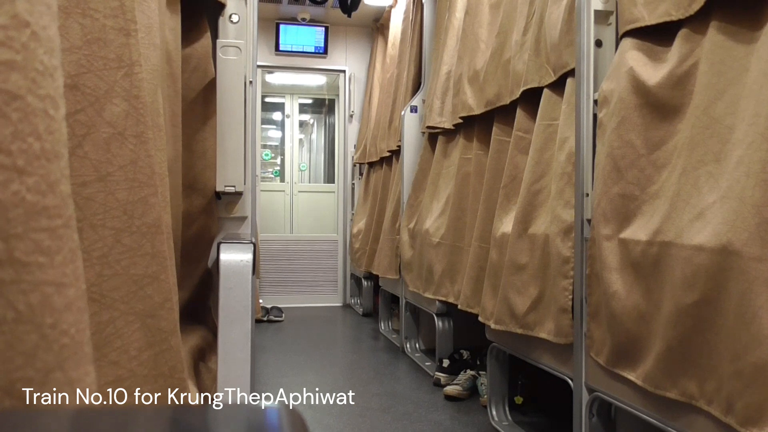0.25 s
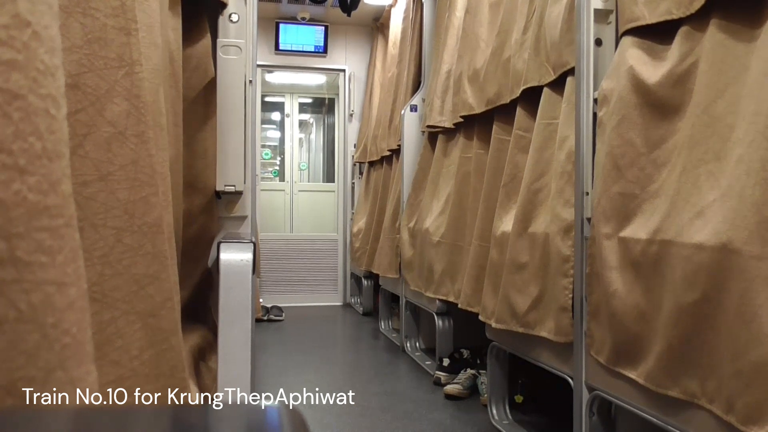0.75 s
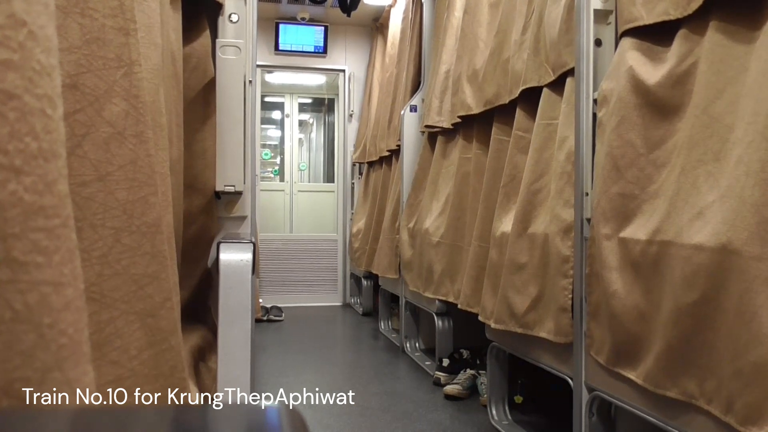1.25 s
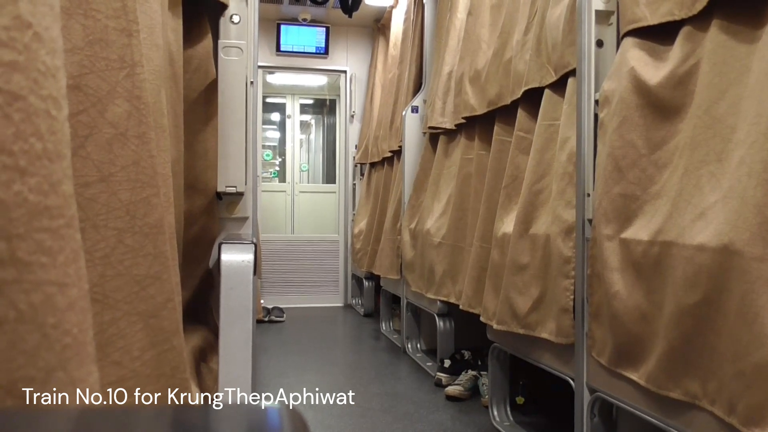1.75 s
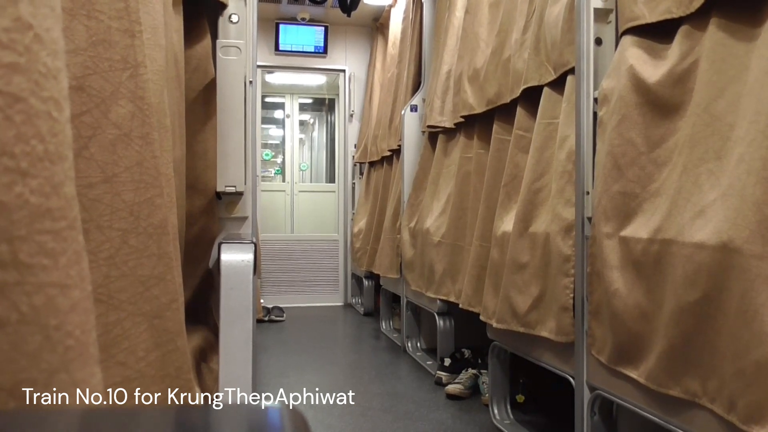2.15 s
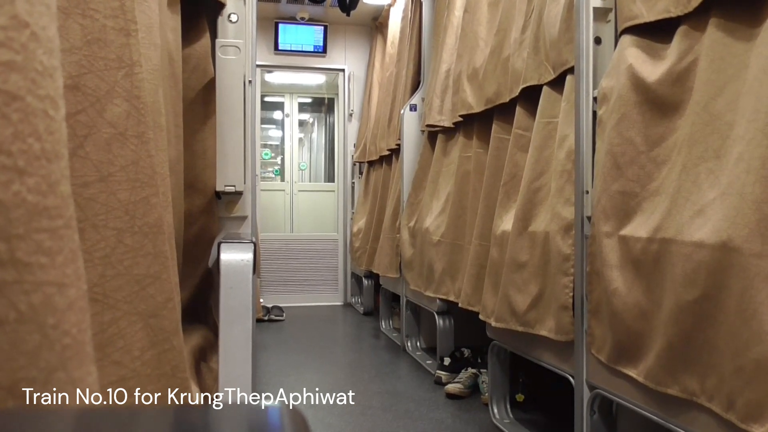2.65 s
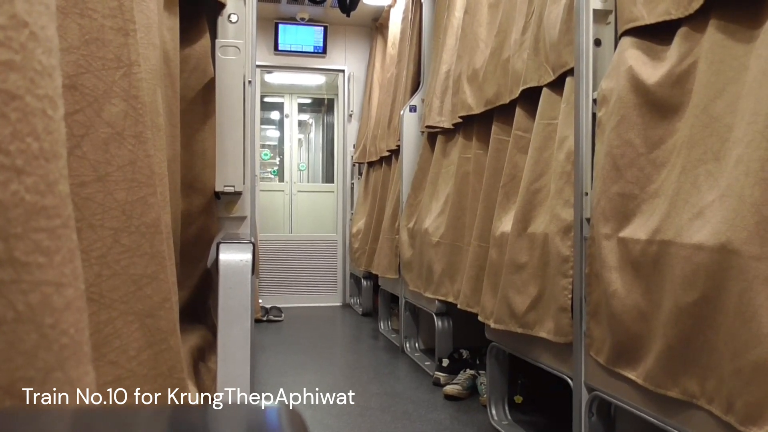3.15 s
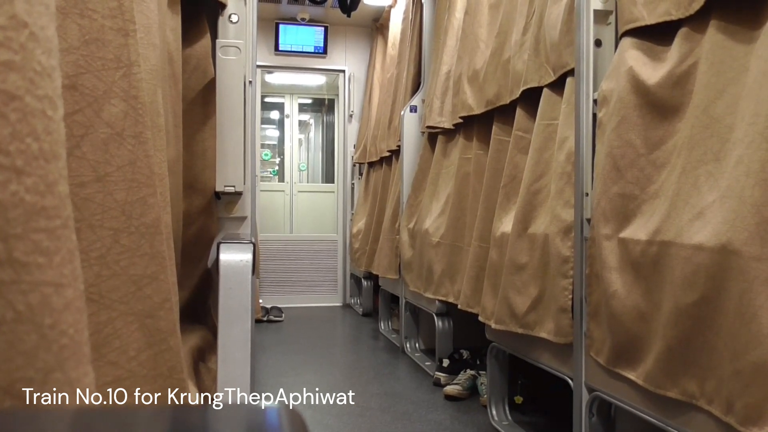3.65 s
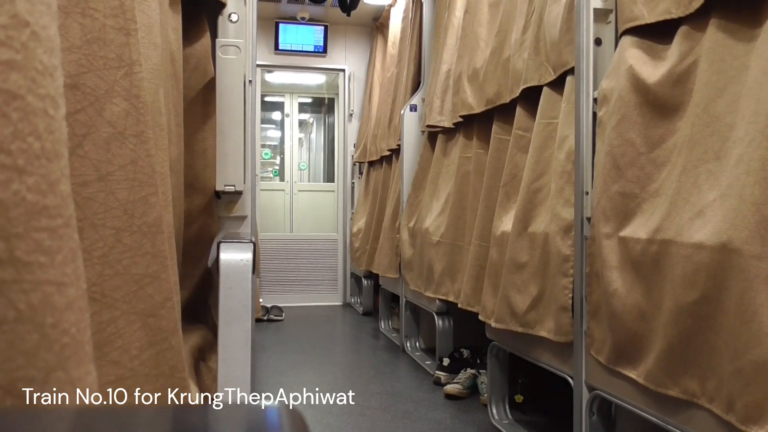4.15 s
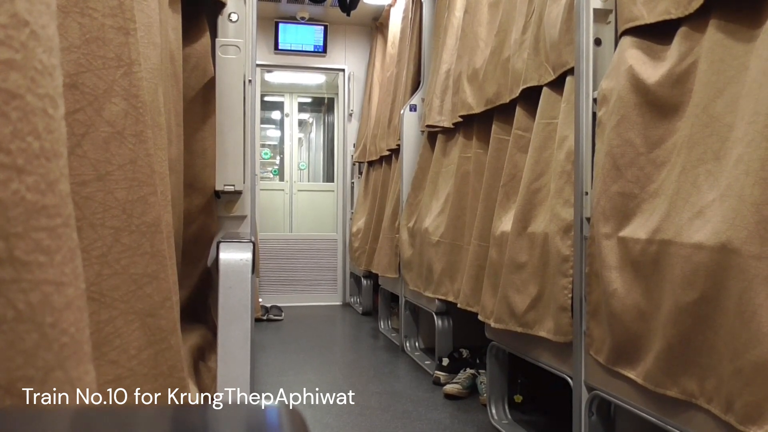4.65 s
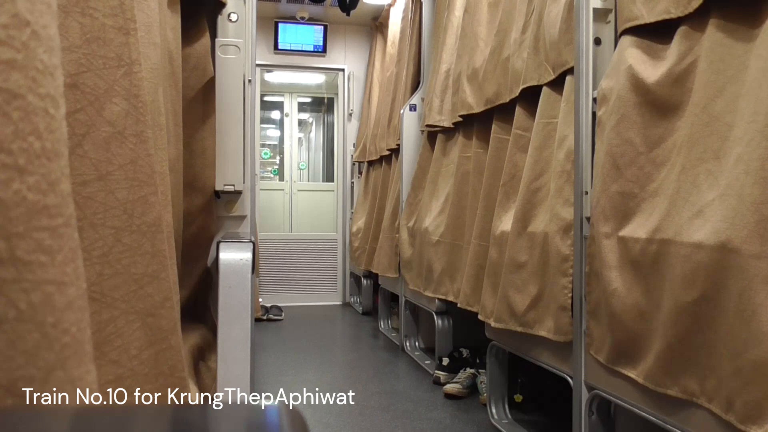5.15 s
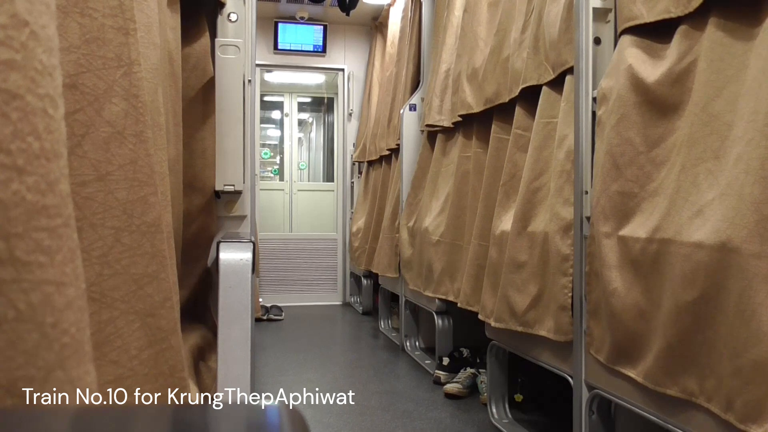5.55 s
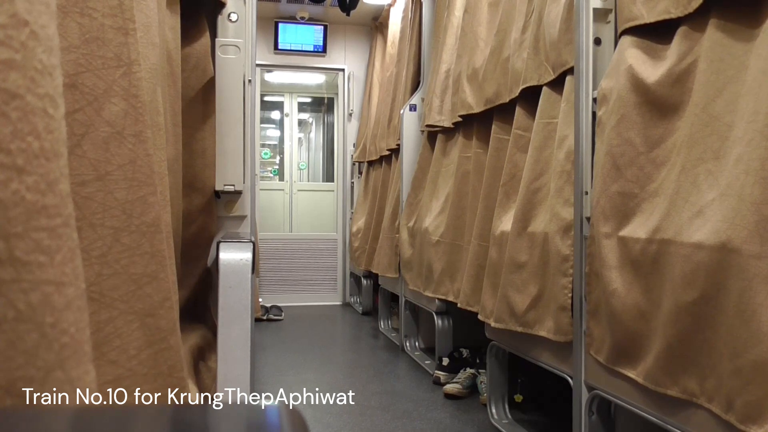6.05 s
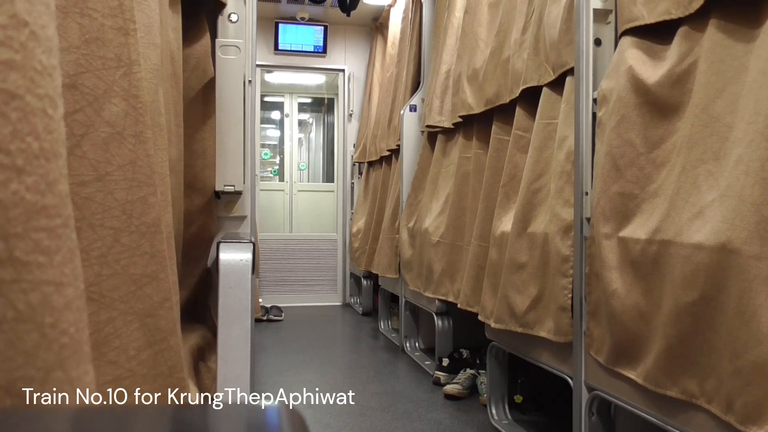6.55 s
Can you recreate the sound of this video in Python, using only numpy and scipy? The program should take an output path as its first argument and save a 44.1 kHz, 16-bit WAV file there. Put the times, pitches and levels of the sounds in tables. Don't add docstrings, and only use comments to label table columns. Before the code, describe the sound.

Deep train rumble with airy hiss inside a sleeper carriage, rubbery squeaks, a rapid loose ticking and dull jolts over rail joints.

```python
import sys
import numpy as np
from scipy import signal
from scipy.fft import rfft, irfft
from scipy.io import wavfile

SR = 44100
rng = np.random.default_rng(int(sys.argv[2]) if len(sys.argv) > 2 else 0)


def field_ratio(decibels):
    return 10 ** (np.asarray(decibels, dtype=float) / 20)


def store_pcm(level_fs):
    pcm = np.round(np.clip(level_fs, -1, 1) * 32767).astype(np.int16)
    wavfile.write(sys.argv[1], SR, np.atleast_2d(pcm).T)


N = 299880

RUMBLE_EDGES_HZ = [20, 110, 220, 450, 1750]
HISS_EDGES_HZ = [1750, 3600, 11300, 17000]
# frequency_hz, density_db_per_hz
RUMBLE_COLOUR = [(13, -63.5), (22, -14), (65, -5), (118, -9.5), (156, 0.5), (210, -5), (294, 3), (323, -5),
                 (361, -2.5), (443, -19.5), (515, -14.5), (668, -22), (1070, -23.5), (1460, -32.5),
                 (1900, -47.5), (2470, -69.5), (4180, -120)]
HISS_COLOUR = [(940, -39.5), (1600, 1), (1760, -2.5), (2280, 0), (2490, -7), (2820, -9), (3200, -15),
               (4470, -16), (7090, -20), (13600, -22), (15900, -21.5)]
ROUGH_COLOUR = [(200, -6.5), (300, 0), (390, 1), (470, -7), (520, -5.5), (620, -9.5), (800, -23)]
TICK_COLOUR = [(1760, -41.5), (3000, -1), (3500, -6.5), (3990, 2), (4500, -4.5), (5390, 5.5), (6740, -7),
               (7740, 1.5), (9550, -4), (11100, 2.5), (12300, -5), (15900, -6)]
# frequency_hz, width_hz, lift_db
CABIN_MODES = [(155.4, 9.9, 2), (183, 7.3, 8), (309, 11, 2), (341.3, 25, 3.5), (522, 14, 3.5),
               (768, 110, 5.5), (922, 56, 5.5), (1050, 35, 3.5), (1190, 77, 4), (2030, 40, 3.5),
               (2104, 38, 5.5), (2765, 70, 6.5), (3500, 58, 2), (4420, 150, 4)]
# frequency_hz, correlation (0 to 1)
PORT_LIKENESS = [(30, 0.94), (60, 0.64), (130, 0.83), (290, 0.68), (640, 0.61), (1410, 0.7), (3100, 0.7),
                 (6820, 0.52), (15000, 0.12)]
# frequency_hz, left_minus_right_db
PORT_BALANCE = [(60, 3.5), (110, 4), (200, -0.5), (380, -5), (700, -3.5), (1290, -4.0), (2380, 0.5),
                (4400, -0.5), (8120, 4), (15000, -0.5)]
# frequency_hz, left_lead_rad
PORT_LEAD = [(0, 0.52), (1290, -0.61), (1550, -0.7), (2150, -1.24), (2580, -0.75), (6030, -0.46),
             (7490, -0.7), (8010, -0.12), (9910, 0.057), (10800, 0.1), (13400, -0.0), (13700, -0.2),
             (14200, 0.07), (15600, -0.0)]

# time_s, level_db, lean_db (floor boom towards cabin drone), grind_db (rail surface)
LOAD = [(0, -19.5, 0, -2.5), (.49, -25.5, -3, -3.5), (.55, -18, -2.5, -6), (1.08, -22, -0.5, -5),
        (1.57, -18, -2, -1), (2.25, -22.5, 0, 2), (2.62, -24, -1.5, -1.5), (2.76, -17.5, -0.5, 1),
        (3.5, -22, -1, -2), (4.07, -23.5, 0, -0.5), (4.3, -23.5, 0, 0.5), (4.75, -26, 1, 1),
        (4.82, -19.5, -0.5, 0), (5.3, -26.5, -3, -1), (5.65, -20.5, 2, 2.5), (5.8, -25.5, 2.5, 2.5),
        (6.34, -21, 0.5, 2), (6.8, -29, -0.5, -1)]
# crest_s, lift_db, length_s
SURGES = [(0.576, 0.5, 0.21), (2.888, 1, 0.087), (3.22, 3.5, 0.071), (4.129, 9, 0.12), (4.828, 2, 0.14),
          (5.593, 1.5, 0.47), (6.379, 2.5, 0.15), (6.57, 3, 0.09), (6.694, 6, 0.15)]
# time_s, level_db, flange_grind_db
ROUGH_RAIL = [(1.0, -31.5, 3), (1.25, -24, 7.5), (1.45, -15.5, 9), (1.58, -16, 9), (1.72, -15.5, 8),
              (1.8, -16.5, 6), (1.95, -14.5, 12.5), (2.1, -12.5, 9), (2.16, -14.5, 5), (2.24, -22, -3),
              (2.35, -35, -0.5)]
# crest_s, lift_db, length_s
FLANGE_BITES = [(.21, 0.5, 0.05), (1.41, 5.5, 0.12), (1.5, 3, 0.068), (1.6, 5.5, 0.1), (1.73, 5, 0.054),
                (1.84, 0, .1), (1.98, 0.5, 0.068), (2.09, 4, 0.1), (2.88, -1.5, 0.056), (2.97, 3.5, 0.35),
                (3.42, 4.5, 0.13), (6.12, 1.5, 0.087)]
# time_s, level_db
SWAY = [(0.0, -33), (0.47, -41), (0.55, -34.5), (1.4, -34.5), (1.75, -41), (2.2, -38.5), (2.5, -42),
        (2.99, -31), (4.03, -39), (4.18, -26.5), (4.26, -34), (6.21, -35), (6.25, -29), (6.5, -33),
        (6.8, -36)]
# level_db, load_share (dB per dB), grind_share (dB per dB)
REGISTERS = [
    (-27.5, 1, 0.018),
    (-25, 0.97, 0.051),
    (-34.5, 0.22, 0.94),
]
# level_db, load_share (dB per dB), grind_share (dB per dB)
AIRS = [
    (-56.5, -0.13, 0.84),
    (-62.5, 0.21, 0.59),
    (-74, -.6, -1.1),
]
# pitch_hz, width_hz, level_db
HUMS = [
    (150.6, 3.5, -35.5),
    (301, 4.7, -36.5),
    (114.4, 3.6, -41),
    (2114, 20, -68),
]
# time_s, pitch_hz, level_db
FLOOR_RIDGE = [(0, 179.7, -29), (.5, 172.6, -32), (2.1, 175.4, -27.5), (2.35, 150, -25.5),
               (3.2, 150, -32.5), (4.0, 147.7, -36.5), (4.8, 151.4, -31), (5.3, 164.4, -40.5),
               (6.8, 154.5, -28)]

# start_s, length_s, pitch_hz, level_db
SLIPS = [(0, 0.01, 1340, -23.5), (0.02, 0.028, 1341, -25.5), (0.118, 0.03, 1348, -27.5),
         (0.152, 0.026, 1387, -39.5), (1.017, 0.042, 1172, -35.5), (1.022, 0.032, 924, -31.5),
         (1.164, 0.043, 1350, -30), (1.21, 0.042, 1493, -25), (1.295, 0.05, 1560, -38),
         (1.343, 0.024, 1340, -31.5), (1.905, 0.056, 1586, -29.5), (1.938, 0.018, 1477, -21),
         (1.965, .023, 1495, -31), (2.404, 0.048, 1070, -27.5), (2.515, 0.09, 1550, -33.5),
         (2.56, 0.042, 1662, -28.5), (2.6, 0.032, 1680, -37.5), (2.627, 0.043, 1485, -35.5),
         (2.709, 0.034, 1467, -31), (2.742, 0.015, 1373, -21.5), (2.752, 0.027, 1200, -24.5),
         (2.785, 0.029, 1210, -30), (4.51, 0.038, 1212, -36), (4.547, 0.046, 1376, -36.5),
         (5.466, 0.057, 1337, -27.5), (5.577, 0.039, 1335, -30), (5.62, .023, 1325, -32),
         (5.52, 0.056, 1335, -41), (5.695, 0.079, 1335, -36.5), (5.812, 0.043, 1340, -26.5),
         (5.863, 0.068, 1328, -35), (5.91, 0.035, 1170, -32), (5.475, 0.048, 1185, -37),
         (5.64, .024, 1676, -44), (5.763, .022, 1390, -48), (1.145, 0.059, 1197, -39)]
# start_s, length_s, from_hz, to_hz, level_db
SLIDES = [(0.084, 0.034, 1412, 1520, -33), (0.171, 0.05, 1400, 1405, -37), (1.127, .024, 1011, 1090, -32.5),
          (1.268, 0.031, 1485, 1510, -32), (2.444, 0.036, 1152, 1232, -14),
          (2.465, 0.044, 1285, 1608, -20.5), (2.493, 0.044, 1505, 1614, -28.5),
          (4.338, 0.028, 1190, 1320, -37), (4.49, 0.066, 1196, 1420, -36.5),
          (4.654, 0.032, 1227, 1170, -33), (5.641, 0.025, 1460, 1485, -33)]
# start_s, length_s, level_db
WHISTLES = [(0, 0.048, -58.5), (2.627, 0.074, -57), (2.698, .075, -60), (5.455, .075, -63)]
# crest_s, overtone_gain_db, length_s
SQUEEZES = [(1.93, 15, .13), (2.5, 16, 0.097), (2.585, 16, 0.15), (2.75, 10.5, 0.041), (5.65, 4, .05)]
# pitch_hz, level_db, t60_s
SQUEAK_PANEL = [(920, -11, .15), (1070, -2.5, 0.098), (1190, 7.5, 0.12), (1350, 5.5, 0.2),
                (1485, 6.5, 0.15), (1710, 1.5, 0.19)]

# start_s, peak_db
EARLY_TICKS = [(0.0228, -35.5), (0.064, -31), (0.1037, -33.5), (0.1436, -31), (0.1847, -36), (0.229, -33.5),
               (0.2648, -32.5), (0.3092, -35), (0.3497, -34.5), (0.39, -32), (0.4349, -38), (0.6564, -36),
               (0.939, -40), (1.0949, -37), (1.1365, -32.5), (1.215, -32), (1.2964, -31.5), (1.3243, -34.5),
               (1.3616, -33.5), (1.3914, -32), (1.458, -30.5), (1.7552, -31.5), (2.1286, -34),
               (2.364, -37.5), (2.4568, -41), (2.487, -35), (2.548, -35), (2.598, -40.5), (2.6414, -38),
               (2.6733, -34), (2.6938, -33.5), (2.9198, -43), (3.1333, -40.5), (3.2405, -40)]
LATE_TICKS = [(4.793, -41), (4.8106, -44.5), (4.9144, -35), (4.9406, -33.5), (4.9677, -39.5), (5.0093, -33),
              (5.0475, -38), (5.068, -33.5), (5.1504, -38), (5.231, -39), (5.269, -33), (5.295, -35),
              (5.3732, -35), (5.4746, -41.5), (5.494, -36), (5.517, -38), (5.5534, -35.5), (5.5723, -35),
              (5.6118, -37.5), (5.6322, -35), (5.654, -32), (5.7077, -36), (5.7819, -32), (5.8442, -38),
              (5.8662, -42), (5.9245, -38.5), (5.945, -35.5), (5.984, -32.5), (6.0234, -37), (6.0917, -36),
              (6.2073, -31), (6.2832, -36.5), (6.4164, -40), (6.4756, -39), (6.5092, -39), (6.5649, -30.5),
              (6.591, -33.5), (6.6676, -32), (6.71, -38), (6.761, -44)]
MORE_TICKS = [(5.361, -40), (6.108, -36), (1.03, -40), (4.71, -49)]

# start_s, peak_db, pitch_hz
PANEL_BLOWS = [(0.053, -8.5, 302.5), (0.153, -15, 345), (0.353, -12.5, 298), (0.418, -9.5, 305),
               (0.62, -7.5, 290), (0.886, -19, 298), (0.992, -13, 284), (1.174, -9.5, 299),
               (1.271, -15, 343), (1.359, -7, 301), (1.426, -18, 396), (1.523, -2.5, 301), (1.621, -8, 311),
               (1.685, -1, 397.4), (1.799, -8.5, 321), (1.965, -24, 316), (2.033, -2.5, 395.6),
               (2.119, -6, 309), (2.334, -18, 308.7), (2.748, -27, 293), (2.963, -8, 289.5),
               (3.13, -10, 288), (3.2, -7, 294.4), (3.301, -11, 237), (3.348, -23, 307),
               (3.627, -12.5, 306), (3.788, -18, 251), (3.985, -20, 354), (4.102, -7.5, 240.4),
               (4.536, -12.5, 287), (4.641, -14, 285.5), (4.782, -10.5, 292.6), (4.925, -7, 360),
               (5.373, -16, 268), (5.5, -7, 286), (5.638, -11.5, 358), (5.798, -10.5, 346),
               (5.894, -11.5, 344), (6.081, -16, 296), (6.189, -9, 349), (6.35, -9, 287), (6.549, -16, 227),
               (6.69, -14, 303), (6.755, -19, 295.5)]
FLOOR_BLOWS = [(0.112, -17, 143.5), (0.299, -23, 175), (0.519, -18, 167), (0.575, -22.5, 166),
               (0.694, -12, 168), (0.78, -3.5, 172.4), (0.968, -16, 149), (1.175, -16.5, 170.5),
               (1.346, -6.5, 164), (1.461, -13.5, 154), (1.649, -14.5, 154), (1.869, -13, 174.7),
               (2.014, -17, 164), (2.101, -16.5, 175.4), (2.182, -18.5, 157.6), (2.278, -18.5, 159.4),
               (2.664, -7, 155.4), (2.762, -5.5, 152.7), (2.851, -6.5, 180.8), (2.972, -8.5, 167.3),
               (3.074, -16.5, 158), (3.316, -15.5, 162.6), (3.475, -9, 181), (3.597, -25, 163.5),
               (4.113, -5.5, 165), (4.546, -11, 165), (4.786, -15.5, 167.7), (4.898, -11.5, 159),
               (4.985, -11.5, 182.7), (5.066, -21, 180.4), (5.145, -20, 195), (5.284, -13.5, 164.6),
               (5.49, -11, 169.6), (5.857, -14, 163), (6.341, -13.5, 183), (6.715, -14, 174.5)]
WALL_TAPS = [(0.203, -20, 551), (0.376, -26, 506), (0.535, -20.5, 574), (0.628, -20, 494),
             (1.062, -30, 524), (1.118, -26, 484), (1.253, -23, 645), (1.357, -16, 670), (1.495, -7, 529),
             (1.549, -20, 505), (1.981, -11, 563), (2.18, -14, 540), (2.283, -17, 504), (2.388, -14.5, 492),
             (2.681, -25, 595), (2.74, -24, 514), (2.855, -17, 466), (3.068, -22, 471), (3.68, -20, 502),
             (4.102, -23.5, 554), (4.198, -17, 519), (4.428, -25.5, 775), (4.634, -33, 533),
             (4.826, -19, 520), (5.051, -27, 527), (5.141, -26, 517), (5.239, -20, 531),
             (5.524, -15.5, 564), (5.779, -19.5, 777), (6.094, -18.5, 756), (6.258, -17.5, 509),
             (6.361, -26, 523), (6.541, -13.5, 522), (6.657, -25, 480)]
# start_s, knock_db, thud_db, clatter_db
JOLTS = [(0.2, -28, -17, -33), (0.532, -19, -13, -49), (0.625, -26.5, -17, -47), (1.024, -16.5, -24, -52),
         (1.39, -6, -11.5, -47), (1.424, -36, -20, -55), (1.59, -22, -18, -33), (1.684, -14, -11, -52),
         (1.712, -21, -10, -58), (2.116, -32, -13.5, -50), (2.386, -23, -10.5, -60),
         (2.851, -6.5, -14.5, -59.5), (2.944, -11, -15.5, -51), (3.066, -39, -28, -56),
         (3.236, -16, -14, -29), (3.39, -18, -20, -59), (3.481, -18, -14, -57), (3.68, -17.5, -33, -58),
         (4.102, -45, -16, -59), (4.828, -24, -16.5, -53), (5.069, -18, -30, -46), (5.139, -20.5, -16, -49),
         (5.234, -28, -24, -42), (5.639, -34, -14, -60), (6.093, -17.5, -31, -42), (6.539, -13, -13.5, -43)]
# pitch_hz, level_db, t60_s
BODY_MODES = [(535, 6, 0.11), (603, 0.5, 0.099), (754, 4, 0.026), (873, -4.5, 0.13), (964, -1.5, 0.06),
              (1060, -6.5, 0.063), (1184, -1, 0.038), (1295, -6.5, 0.047)]


def at_hz(points, hz):
    table_hz, values = np.array(points).T
    return np.interp(np.log(hz + 1), np.log(table_hz + 1), values)


def in_time(rows):
    s, *columns = np.transpose(rows)
    return [np.interp(np.arange(N) / SR, s, column) for column in columns]


def humps(events):
    t = np.arange(N) / SR
    return sum(db * np.cos(np.pi * np.clip((t - s) / length, -.5, .5)) ** 2 for s, db, length in events)


def drift(rate_hz):
    every = 40
    r = np.exp(-80 * np.pi * rate_hz / SR)
    noise = rng.standard_normal(N // every + 2002)
    slow = signal.lfilter([1], [1, -2 * r, r * r], noise)[2000:]
    return np.interp(np.arange(N) / every, np.arange(len(slow)), slow / np.std(slow))


def ring(drive, hz, t60):
    r, w = field_ratio(-60 / (t60 * SR)), 2 * np.pi * hz / SR
    return signal.lfilter([0, np.sin(w)], [1, -2 * r * np.cos(w), r * r], drive + 1e-18)


def bursts(events, column, t60, rise_s):
    t = np.arange(round(t60 * SR) + 2) / SR
    shape = np.zeros(N + SR)
    for row in events:
        at = round(row[0] * SR)
        shape[at:at + len(t)] += field_ratio(row[column] - 60 * t / t60) * np.minimum(t / rise_s, 1)
    return shape[:N]


def pair(left, right):
    hz = np.fft.rfftfreq(N, 1 / SR)
    half = field_ratio(at_hz(PORT_BALANCE, hz) / 2) * np.exp(.5j * at_hz(PORT_LEAD, hz))
    return np.array([irfft(left * half, N), irfft(right / half, N)])


def diffuse(colour, edges_hz, levels_db, flutter_db):
    hz = np.fft.rfftfreq(N, 1 / SR)
    lift_db = sum(db / (1 + (2 * (hz - f) / width) ** 2) for f, width, db in CABIN_MODES)
    alike = np.clip(at_hz(PORT_LIKENESS, hz), 0, 1)
    mid, side = rfft(rng.standard_normal((2, N))) * field_ratio(at_hz(colour, hz) + lift_db)
    mid = mid * np.sqrt(1 + alike)
    side = side * np.sqrt(1 - alike)
    out = 0
    for low, high, level_db in zip(edges_hz, edges_hz[1:], levels_db):
        band = 1 / np.sqrt((1 + (low / (hz + 1)) ** 24) * (1 + (hz / high) ** 24))
        part = pair((mid + side) * band, (mid - side) * band)
        out = out + part / np.std(part.mean(0)) * field_ratio(level_db + flutter_db * drift(7.0))
    return out


def wheel_load():
    level_db, lean_db, grind_db = in_time(LOAD)
    flange_db = in_time(ROUGH_RAIL)[1]
    load_db = level_db - level_db.mean() + humps(SURGES)
    return load_db, lean_db, grind_db + flange_db + humps(FLANGE_BITES)


def rolling_rumble(load_db, lean_db, grind_db):
    boom, drone, roar = (db + a * load_db + b * grind_db for db, a, b in REGISTERS)
    sway = in_time(SWAY)[0] + 0.19 * load_db - 0.14 * grind_db
    levels_db = [sway, boom - lean_db, drone + lean_db, roar]
    return diffuse(RUMBLE_COLOUR, RUMBLE_EDGES_HZ, levels_db, flutter_db=1.27)


def air_hiss(load_db, grind_db):
    levels_db = [db + a * load_db + b * grind_db for db, a, b in AIRS]
    return diffuse(HISS_COLOUR, HISS_EDGES_HZ, levels_db, flutter_db=1.16)


def machine_hums(load_db):
    turn = 2 * np.pi * np.arange(N) / SR
    tones = np.zeros(N)
    for hz, width_hz, db in HUMS:
        in_phase = (1.05 + drift(width_hz)) * np.cos(hz * turn)
        tones += field_ratio(db) * (in_phase + drift(width_hz) * np.sin(hz * turn))
    return tones * field_ratio(0.44 * load_db)


def floor_ridge(load_db):
    width_hz = 10.2
    hz, level_db = in_time(FLOOR_RIDGE)
    turn = 2 * np.pi * np.cumsum(hz) / SR
    noise = drift(width_hz) * np.cos(turn) + drift(width_hz) * np.sin(turn)
    return noise * field_ratio(level_db + 1.04 * load_db)


def seal_glides():
    sag_hz_per_s, whistle_hz = 120, 3580
    locked = []
    for s, length, hz, db in SLIPS:
        sag_hz = sag_hz_per_s * length / 2
        locked.append((s, length, hz + sag_hz, hz - sag_hz, db))
    thin = [(s, length, whistle_hz, whistle_hz, db) for s, length, db in WHISTLES]
    return locked + list(SLIDES) + thin


def seal_squeaks():
    tense_hz, overtones_db, overtones_db_per_hz = 1350, -36.5, -0.03
    purity = .55
    slip = np.zeros(N)
    waver, grip, rasp = drift(70), drift(65), drift(130)
    squeeze_db = humps(SQUEEZES)
    for s, length, from_hz, to_hz, level_db in seal_glides():
        at, count = round(s * SR), round(length * SR)
        now = slice(at, at + count)
        part = np.linspace(0, 1, count)
        hz = from_hz + (to_hz - from_hz) * part
        over_db = overtones_db + overtones_db_per_hz * (hz - tense_hz) + squeeze_db[now]
        over_db = np.minimum(over_db - purity * max(level_db + 25.5, 0), -16.5)
        turn = 2 * np.pi * np.cumsum(hz + 11.2 * waver[now]) / SR
        second = np.sin(2 * turn + 0.72 * rasp[now])
        third = 0.47 * np.sin(3 * turn + 2.0 * rasp[now])
        overtones = field_ratio(over_db) * (second + third) * (1.18 + 0.32 * rasp[now])
        wave = np.sin(turn + 0.21 * rasp[now]) + overtones
        swell = np.sin(np.pi * part) ** 0.75
        slip[now] += np.sqrt(2) * field_ratio(level_db + 2.0 * grip[now]) * swell * wave
    gritty = slip * (1 + .6 * rng.standard_normal(N))
    panel = np.zeros(N)
    for k, (hz, db, t60) in enumerate(SQUEAK_PANEL):
        panel += field_ratio(db - 64.5) * ring(gritty, hz, t60) * (-1) ** k
    return slip + panel


def fitting_ticks():
    delay = 30
    touches = list(EARLY_TICKS) + list(LATE_TICKS) + list(MORE_TICKS)
    grit = rng.standard_normal((3, N))
    rattle = np.roll(bursts(touches, column=1, t60=0.011, rise_s=.0002), delay)
    mirrored = [(N / SR - s, db) for s, db in touches]
    lead_in = np.roll(bursts(mirrored, column=1, t60=0.0066, rise_s=.0001)[::-1], delay)
    strike = np.zeros(N)
    strike[[round(s * SR) + delay for s, db in touches]] = -field_ratio(np.array(touches)[:, 1] + 6.0)
    scrape = 0.88 * grit[0] + grit[1:]
    force = scrape * (field_ratio(-9.5) * rattle + field_ratio(-18.0) * lead_in) + strike
    colour = field_ratio(at_hz(TICK_COLOUR, np.fft.rfftfreq(N, 1 / SR)))
    return irfft(rfft(force) * colour, N) * field_ratio([[5.0], [1.5]])


def drumming(blows, rise_s, t60, gain_db):
    out, waver = np.zeros(N + SR), drift(23)
    t = np.arange(SR // 3) / SR
    phases = rng.uniform(0, 2 * np.pi, len(blows))
    for (s, db, hz), phase in zip(blows, phases):
        at = round(s * SR)
        envelope = field_ratio(db + gain_db - 60 * t / t60) * (1 - np.exp(-t / rise_s))
        out[at:at + len(t)] += envelope * np.sin(2 * np.pi * hz * t + phase)
    return out[:N] * field_ratio(1.2 * waver)


def body_knocks():
    smooth_contact_s = 0.0039
    hard_ring_hz, ring_hz_per_db = 1040, 8.5
    crack_db = -6
    chance = rng.standard_normal((len(JOLTS), len(BODY_MODES)))
    grit, out = rng.standard_normal((2, N)), np.zeros(N)
    t = np.arange(SR // 10) / SR
    rough_s, rough_db = np.transpose(ROUGH_RAIL)[:2]
    for k, (hz, level_db, t60) in enumerate(BODY_MODES):
        force, crack = np.zeros((2, N + SR))
        for (s, knock_db, _, _), luck in zip(JOLTS, chance[:, k]):
            at = round(s * SR)
            away_db = 9.0 * abs(np.log2((hard_ring_hz + ring_hz_per_db * knock_db) / hz))
            contact_s = smooth_contact_s * (2.44 + 30 * field_ratio(np.interp(s, rough_s, rough_db)))
            push = np.minimum(6 * t / contact_s, 1) * np.exp(-t / contact_s)
            push = push / np.sqrt(2 * contact_s * SR)
            force[at:at + len(t)] += field_ratio(knock_db + level_db - 2.5 - away_db + 2.0 * luck) * push
            crack[at] = field_ratio(knock_db + level_db + crack_db - away_db) * smooth_contact_s / contact_s
        scuff = force[:N] * np.roll(grit[k % 2], 999 * k)
        out += ring(scuff + crack[:N], hz, t60)
    return signal.sosfilt(signal.butter(4, [400, 1500], "band", fs=SR, output="sos"), out)


def band_noise(low_hz, high_hz):
    band = signal.butter(2, [low_hz, high_hz], "band", fs=SR, output="sos")
    return signal.sosfilt(band, rng.standard_normal((3, N)))


def joint_jolts():
    low, high = band_noise(120, 313), band_noise(1800, 4900)
    thud = (low[0] + .5 * low[1:]) / np.std(low) * field_ratio(-5.0)
    thud = thud * bursts(JOLTS, column=2, t60=0.23, rise_s=0.0082)
    clatter = (high[0] + 0.51 * high[1:]) / np.std(high) * field_ratio(-13.0)
    clatter = clatter * bursts(JOLTS, column=3, t60=0.11, rise_s=.005)
    knock = rfft(body_knocks())
    return thud + clatter + pair(knock, knock)


def rough_stretch():
    level_db = in_time(ROUGH_RAIL)[0] + 0.41 * humps(FLANGE_BITES)
    return diffuse(ROUGH_COLOUR, [220, 900], [level_db], flutter_db=-2.0)


def scene():
    load_db, lean_db, grind_db = wheel_load()
    rumble = rolling_rumble(load_db, lean_db, grind_db)
    hiss = air_hiss(load_db, grind_db)
    close = machine_hums(load_db) + floor_ridge(load_db) + seal_squeaks()
    ticked = fitting_ticks()
    close += drumming(PANEL_BLOWS, rise_s=0.0071, t60=0.18, gain_db=-3.0)
    close += drumming(FLOOR_BLOWS, rise_s=0.018, t60=0.25, gain_db=-1.5)
    shaken = joint_jolts()
    close += drumming(WALL_TAPS, rise_s=0.0019, t60=0.14, gain_db=-4.0)
    rough = rough_stretch()
    close = rfft(close)
    return rumble + hiss + pair(close, close) + ticked + shaken + rough


def low_pass(x):
    return signal.sosfilt(signal.butter(12, 15840, fs=SR, output="sos"), x)


def record(dry):
    passed = signal.sosfilt(signal.butter(3, 34, "high", fs=SR, output="sos"), dry)
    rounded = np.tanh(passed / 1.3) * 1.17
    cut = signal.sosfilt(signal.cheby2(12, 40, 16150, fs=SR, output="sos"), rounded)
    return low_pass(cut)


dry = scene()
out = record(dry)
store_pcm(out)
```